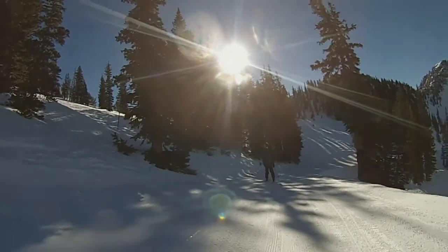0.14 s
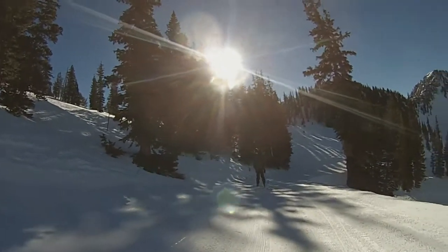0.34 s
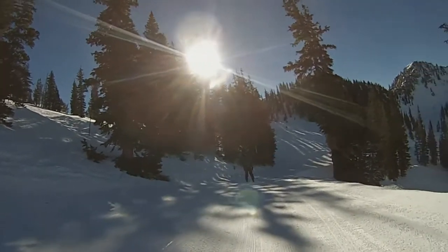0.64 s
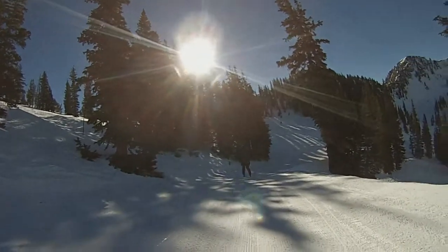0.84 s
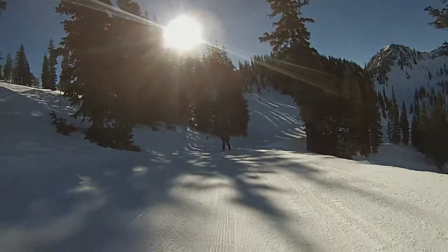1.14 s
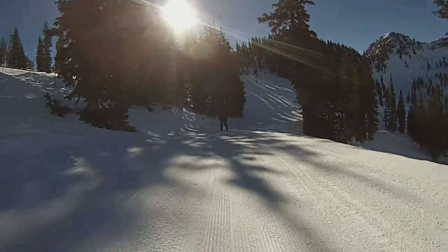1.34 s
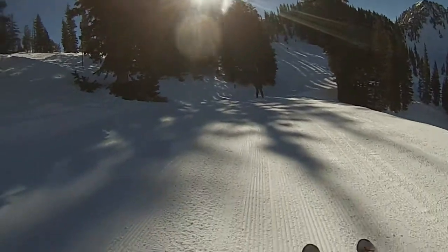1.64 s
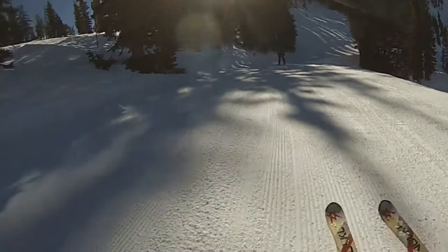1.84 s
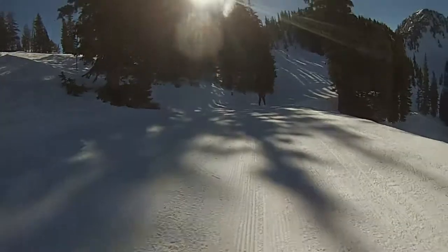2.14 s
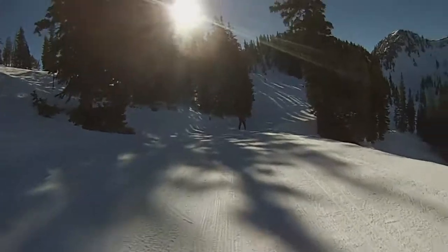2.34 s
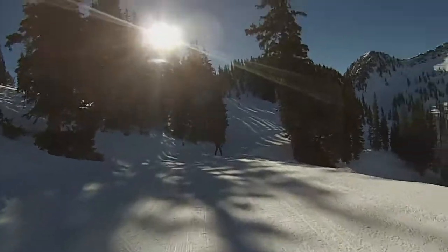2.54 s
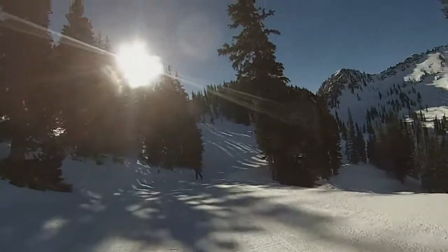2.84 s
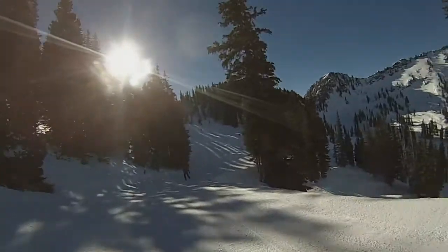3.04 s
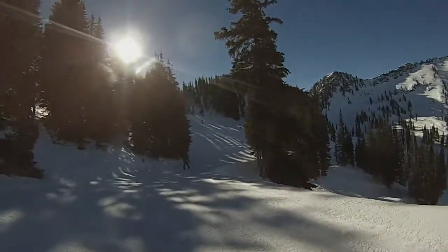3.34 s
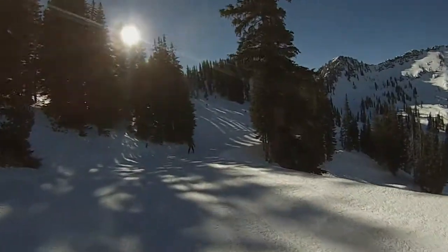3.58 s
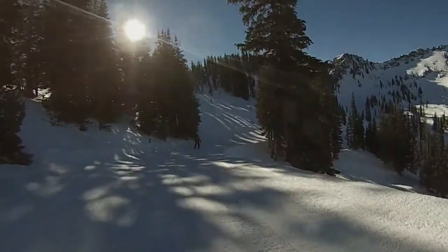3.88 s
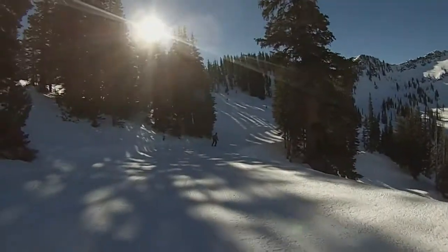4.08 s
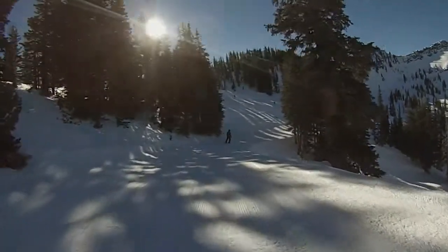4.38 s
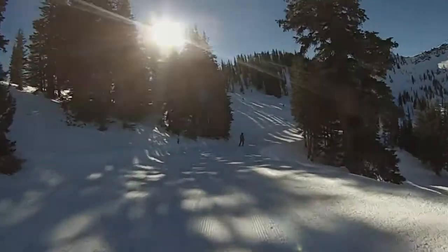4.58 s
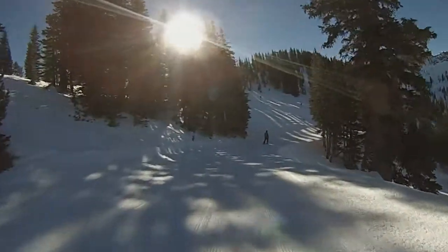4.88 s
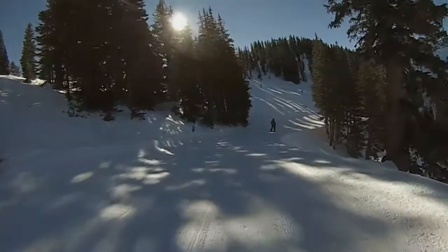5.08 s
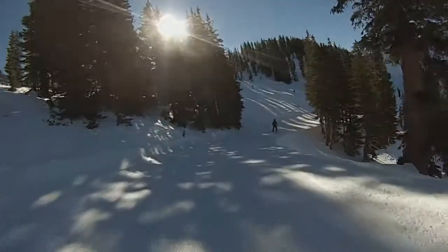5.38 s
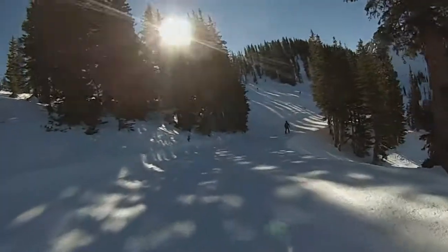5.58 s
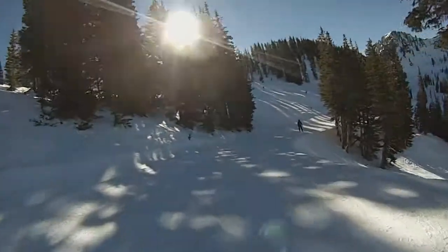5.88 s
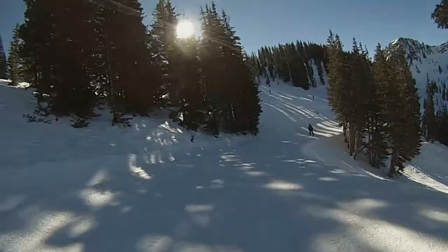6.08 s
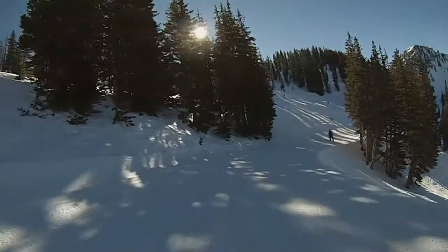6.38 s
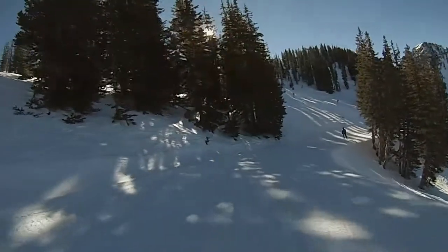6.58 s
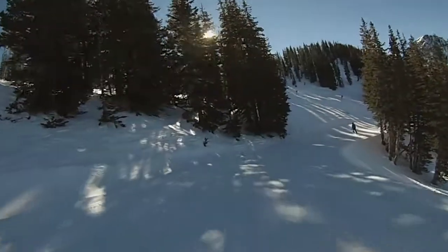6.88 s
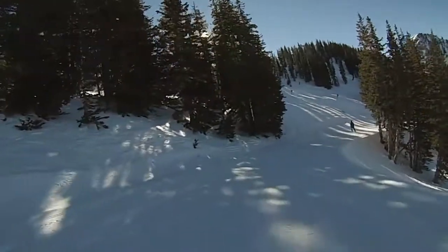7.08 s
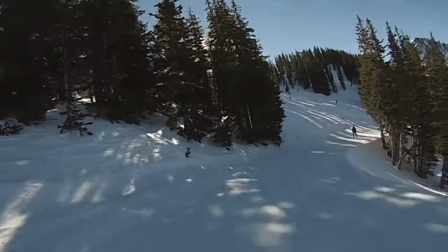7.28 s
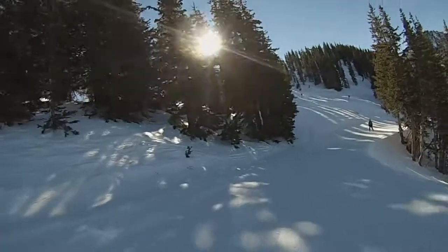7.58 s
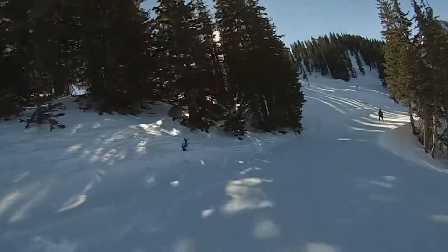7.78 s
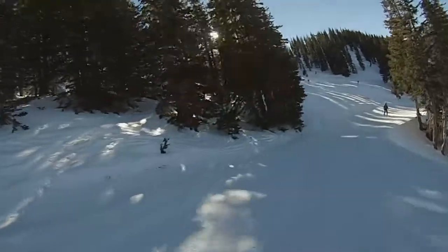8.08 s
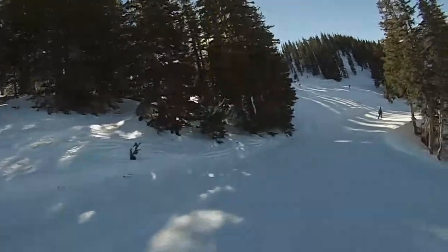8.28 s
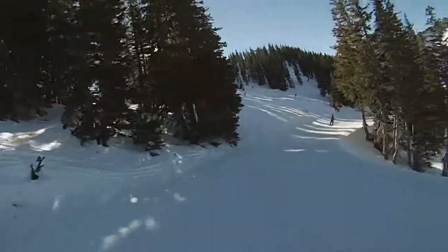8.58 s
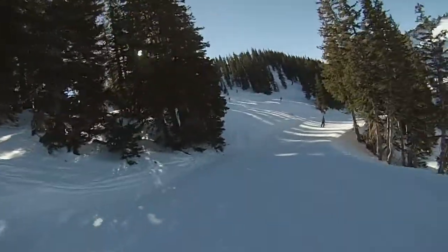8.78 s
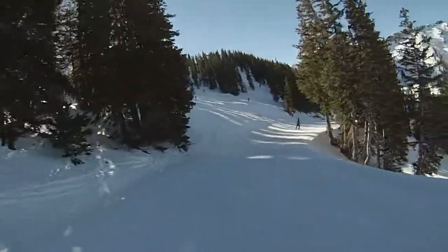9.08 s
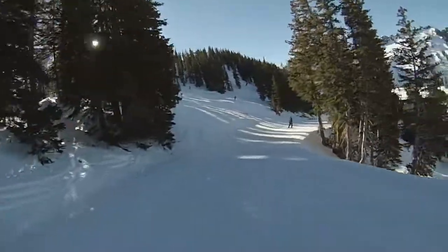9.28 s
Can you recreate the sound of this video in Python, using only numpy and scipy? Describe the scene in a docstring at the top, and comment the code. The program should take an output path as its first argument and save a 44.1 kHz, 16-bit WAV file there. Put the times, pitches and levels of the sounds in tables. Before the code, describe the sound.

Close plastic clacks, boomy thuds and ratcheting hinge snaps interrupt a steady ski hiss, which then grows faster over low wind rumble.

```python
"""Skis hiss over groomed snow throughout, heard in a helmet camera with wind on its housing and a hum in its mount.
After a faint clack, a gloved hand tilts the camera: filtered noise makes the stiff hinge rub and slip with snaps,
decaying sines make the mount boom, and the gripped camera nods and sways until the hand lets go.
The plastic case, noise cracks over ringing modes, clacks as it is pushed back.
Then the run gathers speed, bumps thud up through the mount, and the case clacks a few more times."""
import sys
import numpy as np
from scipy import signal
from scipy.fft import rfft, irfft
from scipy.io import wavfile
from scipy.ndimage import uniform_filter1d, minimum_filter1d

SR = 44100
rng = np.random.default_rng(int(sys.argv[2]) if len(sys.argv) > 2 else 0)


def dump(signal):
    """Clip the signal to [-1, 1] and save it as 16-bit WAV at the path in sys.argv[1]."""
    limited = np.clip(np.atleast_2d(signal).T, -1, 1)
    pcm = np.round(limited * 32767).astype(np.int16)
    wavfile.write(sys.argv[1], SR, pcm)


N = 415863
TIME = np.arange(N) / SR  # s
RELEASE_S = 1.8  # the hand lets go

# level of the hiss before its trim: it drops at 0.84 s and is back by 3.3 s, then swells with speed: (t/s,
# level/dB)
GLIDE = [(0, -52), (0.3, -54.5), (0.42, -50), (0.79, -51), (0.84, -64.5), (1.92, -69), (2.1, -63.5),
         (2.42, -64), (3.1, -54), (3.3, -50), (3.62, -52), (4.35, -51.5), (5.65, -50.5), (6.88, -46.5),
         (7.08, -43.5), (7.88, -42), (8.7, -48), (9.43, -48)]
# resonances of the hinge: (f/Hz, width/Hz, lift/dB)
HINGE_RESONANCES = [(675, 25, 5), (1450, 140, 7.5), (1911, 100, 15.5), (2485, 55, 12), (2920, 180, 9),
                    (3530, 100, 3), (4170, 170, 11), (4850, 260, 4.5), (6380, 160, 10), (7700, 77, 14),
                    (11040, 360, 14)]
# jolts to the mount: (t/s, strength/dB, lift of the lowest mode/dB, sway relative to strength/dB)
JOLTS = [(0.805, -14, 0, -5), (0.825, -3, -5, -4.5), (0.85, -5, 3.5, -22.5), (0.878, -17, -2, -16),
         (0.926, -8.5, -2, -16.5), (0.973, -2.5, 3, -17), (0.992, 0.5, 1.5, -24), (1.055, -6.5, 4.5, -10.5),
         (1.117, -15.5, 5, -6), (1.183, -4.5, 5, -11.5), (1.239, -16.5, 4, -7), (1.282, -3, -2, -28.5),
         (1.428, -4.5, -10.5, -22), (1.496, -8, -13, -22.5), (1.572, -4.5, -13, -16.5),
         (1.619, -8, -10.5, -14), (1.657, -6.5, -10, -19), (1.671, -7, -16.5, -19.5),
         (1.707, -11, -10, -9.5), (2.15, -11.5, -3, 0), (2.185, -17.5, 5.5, 2), (2.238, -14, -3.5, 1),
         (7.783, -21, -2, 0)]


def undb(db):
    """Decibels to gain."""
    return 10 ** (np.asarray(db) / 20)


def unit(x):
    """Scale to rms 1."""
    return x / np.sqrt(np.mean(x ** 2))


def peaked(x):
    """Scale a noisy hit so that its peaks come near 1."""
    loudest_power = uniform_filter1d(x ** 2, size=130).max()
    return x / np.sqrt(4 * loudest_power)


def add(out, s, x):
    """Mix x into out from time s."""
    i = int(s * SR)
    out[i:i + len(x)] += x[:N - i]


def response(points, peaks=(), size=4096):
    """Minimum-phase impulse response of a broad colour with resonances on top."""
    hz = np.arange(size // 2 + 1) * SR / size + 1
    f, db = np.transpose(points)
    octaves_outside = np.maximum(np.log2(f[0] / hz), 0) + np.maximum(np.log2(hz / f[-1]), 0)
    db = np.interp(np.log(hz), np.log(f), db) - 18 * octaves_outside
    for centre, width, lift in peaks:
        db = db + lift / (1 + (2 * (hz - centre) / width) ** 2)
    # folding the cepstrum forward puts the energy as early as the colour allows
    cepstrum = irfft(np.log(undb(db)))
    cepstrum[1:size // 2] *= 2
    cepstrum[size // 2 + 1:] = 0
    return irfft(np.exp(rfft(cepstrum)))


def through(x, body):
    """Pass x through an impulse response."""
    return signal.fftconvolve(x, body)[:len(x)]


def brighten(x, db, corner_hz=3300):
    """Lift the treble for a harder contact, or lower it for a softer one."""
    lowpass = signal.butter(2, corner_hz, fs=SR, output="sos")
    low = signal.sosfiltfilt(lowpass, x)
    return low + undb(db) * (x - low)


def ring(modes, t):
    """Decaying sines of a struck body."""
    return sum(undb(db) * np.sin(2 * np.pi * hz * t) * undb(-60 * t / t60) for hz, db, t60 in modes)


def deepen(modes, lift_db):
    """The same modes with the lowest one struck harder or softer."""
    (hz, db, t60), *rest = modes
    return [(hz, db + lift_db, t60)] + rest


def walk(rate):
    """Random levels held 1 / rate s and smoothed twice; rms 1."""
    hold = max(int(SR / rate), 1)
    steps = np.repeat(rng.standard_normal(N // hold + 1), hold)
    smooth = uniform_filter1d(uniform_filter1d(steps, hold), hold)
    return unit(smooth[:N])


def grains(rate, spread_db):
    """Tiny fractures at random moments, rate per second, a few much larger than the rest."""
    size = undb(spread_db * np.minimum(rng.exponential(size=N), 5))
    breaks = rng.random(N) < rate / SR
    return unit(breaks * size * rng.standard_normal(N))


def burst(t, t60, rise_s=0.0022):
    """A cluster of micro-contacts that builds quickly and dies away."""
    decay = np.exp(-np.log(1000) * t / t60)
    return rng.choice([-1., 1.], len(t)) * np.minimum(t / rise_s, 1) * decay


def swells(table):
    """Smooth rises and falls in dB, one for each row."""
    return sum(db * np.cos(np.pi * np.clip((TIME - s) / length, -.5, .5)) ** 2 for s, length, db in table)


def glide_level():
    """Level in dB of the snow's hiss at every sample, before its trim."""
    s, db = np.transpose(GLIDE)
    return np.interp(TIME, s, db)


def follow(easy_db, slope, cruise_db=-50):
    """Level in dB of a layer: easy_db when the hiss is at cruise_db, then slope dB per dB of hiss."""
    return easy_db + slope * (glide_level() - cruise_db)


def scuffs(rate=20, lift_db=3.8, fade_s=.008):
    """Brief lifts in dB where an edge catches a crust of snow."""
    catches = (rng.random(N) < rate / SR) * rng.uniform(.5, 1.5, N)
    fade = np.exp(-TIME[:SR // 4] / fade_s)
    return lift_db * np.minimum(through(catches, fade), 2)


def skis(flutter_db=0.34, lean_db=0.1, trim_db=-0.12):
    """Bases slide, edges shear crystals and fine spray hisses; pressure flutters over the groomed ridges."""
    # colours of the sliding bases, sheared snow and spray: (f/Hz, relative level/dB)
    slide_colour = [(150, -0.5), (300, -1.5), (450, -1.5), (620, 0), (850, -3.5), (1050, -1.5),
                    (1400, -12.5)]
    snow_colour = [(900, -26.5), (1120, -13.5), (1280, -4), (1620, -13), (1850, -6.5), (2400, -3.5),
                   (2700, -15.5), (3600, -16), (4500, -31)]
    spray_colour = [(2800, -37), (4000, -2), (4500, -4.5), (5000, 0), (5800, -7), (6600, -7), (8000, -12.5),
                    (10000, -17.5), (11000, -15.5), (12000, -21.5), (15000, -22.5)]
    # resonances of the housing under the hiss: (f/Hz, width/Hz, lift/dB)
    housing = [(1271, 172, 8), (1791, 82, 9), (2084, 130, 4.5), (2890, 130, 7.5)]
    # an edge bites and scrapes: (middle t/s, length/s, lift/dB)
    scrapes = [(.57, 0.056, 6), (3.94, .09, 4.5), (4.28, 0.062, 5), (4.85, 0.41, 1), (6.9, 0.035, 2.5),
               (8.43, 0.056, 1.5)]

    pressure = undb(flutter_db * walk(rate=41))
    slide = rng.standard_normal(N) + .5 * grains(rate=530, spread_db=1.5)
    shear = rng.standard_normal(N) + 0.81 * grains(rate=3200, spread_db=3.0)
    spray = rng.standard_normal(N) + 0.46 * grains(rate=5500, spread_db=5.0)

    slide_db = follow(easy_db=-60, slope=0.74)
    spray_db = follow(easy_db=-60, slope=0.88) + 0.44 * walk(rate=14)
    shear_db = glide_level() + trim_db + scuffs() + swells(scrapes)
    shear_db += 1.0 * walk(rate=55) + lean_db * walk(rate=8.9)

    slide = unit(through(slide, response(slide_colour))) * undb(slide_db)
    shear = unit(through(shear, response(snow_colour, housing))) * undb(shear_db)
    spray = unit(through(spray, response(spray_colour))) * undb(spray_db)
    return pressure * (slide + shear + spray)


def ride():
    """Eddies buffet the housing, and the skis' shudder hums in the mount."""
    # colours of the wind and the hum: (f/Hz, relative level/dB)
    wind_colour = [(15, -1), (30, 2.5), (45, 2), (60, -5), (80, -16), (130, -27)]
    rumble_colour = [(55, -10), (85, -8.5), (106, 5), (125, -3.5), (150, 0), (190, -19), (260, -28),
                     (450, -31.5)]
    # gusts on the housing, then rough snow that shakes the skis: (middle t/s, length/s, lift/dB)
    gusts = [(.68, 0.66, 2), (3.05, 0.97, 8.5), (4.85, 1.6, 11.5), (7.45, 0.78, 4.5), (8.4, 0.78, 8.5),
             (9.08, 0.55, 8)]
    rough_snow = [(.29, .12, 12), (4.48, 0.6, 11.5), (5.4, 1.2, 10.5), (6.75, .4, 5), (7.5, 1.2, 8.5),
                  (8.6, 2.2, 17)]

    wind_db = follow(easy_db=-48.5, slope=.25) + swells(gusts) + 1.5 * walk(rate=9.3)
    rumble_db = follow(easy_db=-59, slope=.7) + swells(rough_snow) + 2.74 * walk(rate=25)
    # the long responses resolve the bass
    wind = unit(through(rng.standard_normal(N), response(wind_colour, size=16384)))
    rumble = unit(through(rng.standard_normal(N), response(rumble_colour, size=16384)))
    return wind * undb(wind_db) + rumble * undb(rumble_db)


def case(crack_t60=0.014, ring_db=0, scatter_db=-1.5, contact_s=0.0018):
    """Each clack is a brief crack and the ring of the shell, a little different at every point of contact."""
    # colour of the cracks and grating: (f/Hz, relative level/dB)
    case_colour = [(200, -20), (340, -17.5), (470, -4.5), (580, -11.5), (720, 1), (900, -0.5), (1020, -9.5),
                   (1220, 4.5), (2000, 1.5), (2350, -16), (3300, -8.5), (3800, -21.5), (4900, -15),
                   (6500, -32.5), (7300, -41), (15000, -50)]
    # ringing of the shell before scatter: (f/Hz, relative level/dB, t60/s)
    shell_modes = [(462, -13, 0.1), (706, -10, 0.054), (821, -10, 0.065), (1126, -6, 0.1),
                   (1326, -20, 0.03), (1506, -0.5, .05), (1967, 3.5, .05), (2072, 1.5, 0.047),
                   (2557, -1, 0.065), (3214, -19, 0.075), (3420, -22.5, .055), (4160, -18, 0.041),
                   (4910, -17, 0.046), (6290, -20.5, 0.071), (11100, -33.5, .03)]
    # the case clacks: (t/s, peak/dB, treble lift/dB)
    clacks = [(0.19, -35.5, 7), (0.802, -7.5, 4), (0.822, -1, -2.5), (2.129, -21.5, 9.5), (2.147, -2, -10),
              (2.157, -9.5, 2), (2.168, -4, -5), (2.18, -7.5, -9), (2.234, -15.5, -1), (2.311, -40, 8),
              (3.38, -32.5, 13), (3.482, -34, 7), (7.781, -10, 9), (7.783, -6, -11), (7.814, -19, 8.5),
              (7.925, -28, 7), (8.387, -28.5, 5)]
    # it grates as it is seized and as it is pushed back: (t/s, length/s, level/dB)
    shoves = [(0.821, 0.011, -12), (0.832, 0.022, -26.5), (2.145, .04, -18)]

    out, body, t = np.zeros(N), response(case_colour), TIME[:SR // 4]
    for s, db, treble_db in clacks:
        shell = np.zeros(len(t))
        for hz, mode_db, t60 in shell_modes:
            detune, strength, side = rng.standard_normal(3)
            mode = (hz * (1 + .004 * detune), mode_db + scatter_db * strength, t60)
            shell += np.sign(side) * ring([mode], t)
        crack = unit(through(burst(t, crack_t60), body))
        clack = crack + undb(ring_db) * unit(shell * np.minimum(t / contact_s, 1))
        add(out, s, peaked(brighten(clack, treble_db)) * undb(db))
    for s, length, db in shoves:
        grate = through(rng.standard_normal(len(t)) * (t < length), body)
        add(out, s, grate * undb(db) / np.sqrt(np.sum(body ** 2)))
    return out


def judder(start_s=1.658, gap_s=.0142, gap_ratio=0.94, first_db=-9, fade_db=1.73, treble_db=12, count=12):
    """Snaps that come ever sooner and weaker as the hinge comes to rest: (t/s, peak/dB, treble lift/dB)."""
    gaps = gap_s * gap_ratio ** np.arange(count)
    return [(start_s + gaps[:k].sum(), first_db - k * fade_db, treble_db) for k in range(count)]


def hinge(slip_t60=0.015, edge_s=0.0032, chatter_db=4.0):
    """Plastic faces grind in short judders, then stick and let go in separate snaps."""
    # colour of the hinge: (f/Hz, relative level/dB)
    hinge_colour = [(150, 14), (450, -10.5), (900, 2.5), (1030, -6), (1350, 5.5), (1700, -6.5), (2200, -2),
                    (2750, -8), (3400, -1), (3780, -19), (5000, -12.5), (6400, -27), (7200, -38.5),
                    (11000, -45.5), (15000, -54.5)]
    # the faces rub: (t/s, length/s, level/dB, treble lift/dB)
    rubs = [(0.794, 0.055, -21, -4.5), (0.85, 0.062, -39, -15), (0.913, 0.026, -29, -4.5),
            (0.944, 0.03, -21, 2), (0.988, 0.02, -24, 2.5), (1.038, 0.019, -25.5, -0.5),
            (1.111, 0.016, -32, 2), (1.138, 0.033, -30.5, -3), (1.179, 0.018, -22, -0.5),
            (1.24, 0.01, -31, -4), (1.28, 0.031, -25.5, 1), (1.61, 0.12, -35.5, -4.5),
            (1.712, .05, -30.5, 14), (1.803, 0.015, -33.5, -34), (1.824, 0.037, -45.5, 3)]
    # the faces slip with a snap: (t/s, peak/dB, treble lift/dB)
    slips = [(1.116, -21, 13.5), (1.283, -17, 1), (1.354, -26.5, 27.5), (1.429, -8, 8),
             (1.497, -12.5, 17.5), (1.528, -13.5, 11), (1.542, -9.5, 16), (1.572, -5.5, 9),
             (1.619, -11.5, 18), (1.642, -12.5, 15.5)]
    # one faint grind for as long as the hand turns it: (t/s, length/s, level/dB)
    turn = (.85, .93, -47)

    out, body = np.zeros(N), response(hinge_colour, HINGE_RESONANCES)
    t = TIME[:SR // 4]
    grind = rng.standard_normal(N) + 0.53 * grains(rate=2300, spread_db=5.0)
    grind *= undb(chatter_db * walk(rate=150))
    for s, length, db, treble_db in rubs:
        contact = np.clip(np.minimum(t, length + edge_s - t) / edge_s, 0, 1)
        touching = grind[int(s * SR):][:len(t)] * contact
        rub = brighten(through(touching, body), treble_db)
        # a longer contact carries more energy
        add(out, s, unit(rub) * np.sqrt(np.mean(contact ** 2)) * undb(db))
    for s, db, treble_db in slips + judder():
        snap = brighten(through(burst(t, slip_t60), body), treble_db)
        add(out, s, peaked(snap) * undb(db))
    s, length, db = turn
    add(out, s, unit(through(grind[:int(length * SR)], body)) * undb(db))
    return out


def mount(catch_s=0.018, rise_s=0.0024, thud_t60=0.088, thud_db=-15, held_db=-1, free_db=-8):
    """Jolts boom, damped under the glove and ringing on once it lets go; each one catches the one before."""
    # modes in the hand's grip, then free: (f/Hz, relative level/dB, t60/s)
    held_modes = [(58, -4, 0.11), (88, 3, 0.07), (151, 0, 0.12), (227, -14.5, 0.087)]
    free_modes = [(43, -2.5, 0.64), (108, 4.5, 0.39), (137.6, -3, 0.27), (248, -21.5, 0.5)]

    out, t = np.zeros(N), TIME[:SR // 2]
    ends = [row[0] for row in JOLTS[1:]] + [TIME[-1]]
    dull = response([(120, 8.5), (300, -3.5), (700, -16.0), (1200, -31.5)])
    for (s, db, deep_db, _), end in zip(JOLTS, ends):
        if s < RELEASE_S:
            boom = ring(deepen(held_modes, deep_db), t)
            thud = peaked(through(burst(t, thud_t60), dull))
            boom = undb(held_db) * boom / np.abs(boom).max() + undb(thud_db) * thud
        else:
            boom = undb(free_db) * ring(deepen(free_modes, deep_db), t)
        envelope = np.clip(np.minimum(t / rise_s, (end - s - t) / catch_s + 1), 0, 1)
        add(out, s, -undb(db) * boom * envelope)
    return out


def shaken(strengths, t60, rise_s=0.0088, let_go_s=.04):
    """Size of a vibration that each jolt starts afresh and that ends when the hand lets go."""
    size = np.zeros(N)
    for s, db in strengths:
        i = int(s * SR)
        size[i:] = undb(db) * np.exp(-np.log(1000) * TIME[:N - i] / t60)
    held = np.clip((RELEASE_S - TIME) / let_go_s + .5, 0, 1)
    return uniform_filter1d(size, int(rise_s * SR)).clip(0) * held


def grip(buzz_db=-16, nod_db=-9.0, uneven_db=3, wander=.14):
    """The jolted camera nods and sways in the hand; its slack hinge chatters unevenly, once in every sway."""
    # colour of the chatter: (f/Hz, relative level/dB)
    buzz_colour = [(1200, -13.5), (2500, 3), (3500, -0.5), (5200, -5), (6400, -17), (7300, -17.5),
                   (11000, -43.5), (15000, -49)]
    nod_hz, sway_hz = 131.6, 79.9  # the sway's rate wanders about its value

    nod = shaken([(s, db + nod_db) for s, db, _, _ in JOLTS], t60=0.52)
    sway = shaken([(s, db + share_db) for s, db, _, share_db in JOLTS], t60=0.47)
    nodding = np.sin(2 * np.pi * nod_hz * TIME)
    swaying = np.sin(2 * np.pi * np.cumsum(sway_hz * (1 + wander * walk(rate=22))) / SR)
    touch = np.maximum(swaying, 0) ** 4 * undb(uneven_db * walk(rate=73))
    chatter = unit(through(rng.standard_normal(N), response(buzz_colour, HINGE_RESONANCES)))
    buzz = np.sqrt(nod * sway) * touch * chatter
    return np.sqrt(2) * (nod * nodding + sway * swaying) + undb(buzz_db) * buzz


def bumps(rise_s=0.007, crunch_t60=0.091, crunch_db=-3):
    """Ridges of snow give soft thuds through legs and helmet, each with a dull crunch."""
    # a bump as it arrives at the camera: (f/Hz, relative level/dB, t60/s)
    bump_modes = [(110, -2, 0.21), (144.4, 5.5, 0.1), (180.3, -15, 0.032)]
    # the skis hit bumps: (t/s, thud peak/dB, crunch relative to thud before crunch_db/dB)
    hits = [(3.176, -27, -13), (4.685, -26.5, -21), (4.798, -28.5, -32), (4.848, -29.5, -23),
            (5.104, -18, -24), (5.185, -31.5, -15), (9.003, -32, -6.5), (9.163, -37.5, 4.5)]

    out, t = np.zeros(N), TIME[:SR // 3]
    dull = response([(200, 1), (420, -2.5), (650, 3), (1000, -10), (1500, -29)])
    for s, db, share_db in hits:
        thud = ring(bump_modes, t) * np.minimum(t / rise_s, 1)
        crunch = peaked(through(burst(t, crunch_t60), dull))
        add(out, s, undb(db) * (thud / np.abs(thud).max() + undb(share_db + crunch_db) * crunch))
    return out


def scene():
    """Everything reaches one microphone inside the housing."""
    handling = case() + hinge() + mount() + grip()
    return (skis() + ride() + handling + bumps())[None]


def record(dry, top_hz=15300):
    """A fast limiter holds the loudest knocks to full scale; then the top is cut."""
    allowed = 1 / np.maximum(np.abs(dry), 1)
    gain = uniform_filter1d(minimum_filter1d(allowed, size=200), size=200)
    lowpass = signal.ellip(10, .2, 70, top_hz, fs=SR, output="sos")
    return signal.sosfilt(lowpass, dry * gain)


dry = scene()
out = record(dry)
dump(out)
```